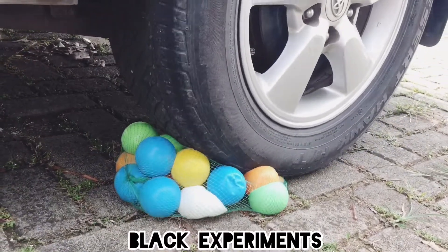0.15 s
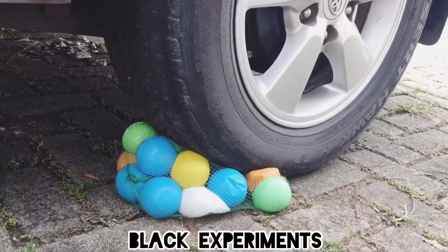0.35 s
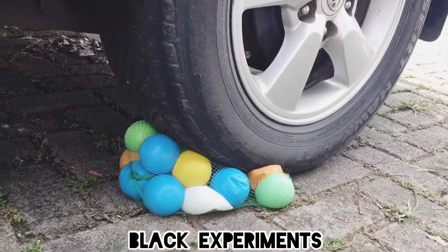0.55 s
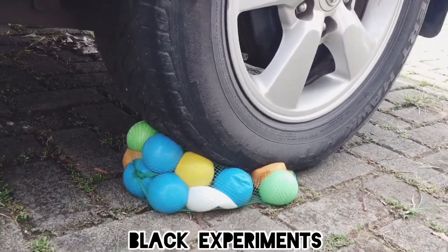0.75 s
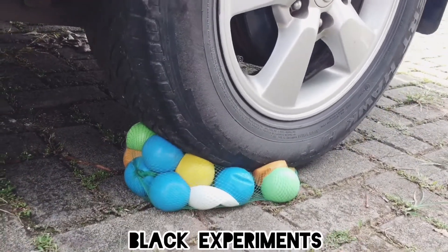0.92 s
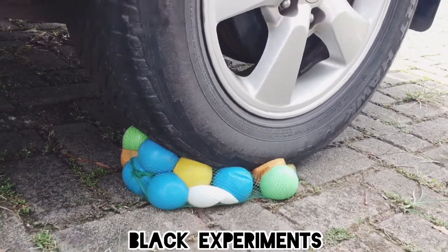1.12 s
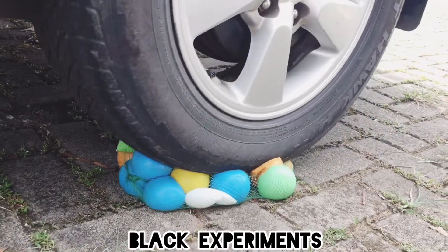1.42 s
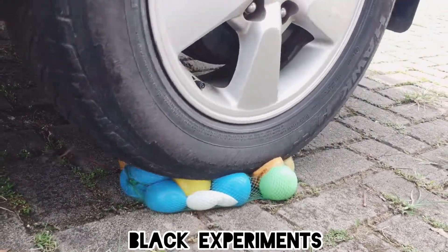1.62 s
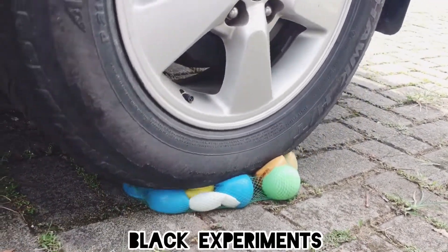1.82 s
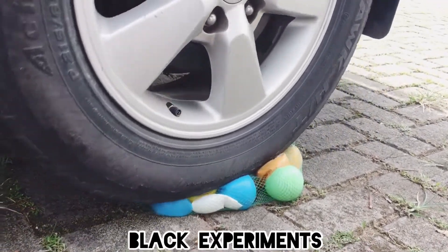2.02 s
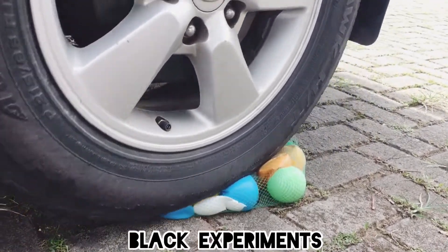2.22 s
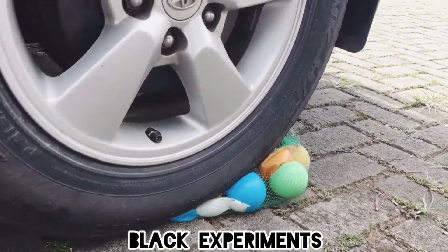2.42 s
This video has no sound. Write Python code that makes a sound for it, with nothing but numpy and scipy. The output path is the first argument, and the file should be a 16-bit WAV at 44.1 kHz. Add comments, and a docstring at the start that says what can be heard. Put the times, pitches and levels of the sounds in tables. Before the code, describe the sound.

Hollow plastic balls crack, crunch and pop under a slowly rolling car tyre, engine rumbling low

```python
"""Hollow plastic balls in a net on paving stones snap as a car creeps over them.
Each shell that buckles gives a crack of noise and a short ring; smaller buckles make a fine crinkle.
Two balls burst in blasts of noise, and air hisses and whistles out of the split ones.
The engine, just above idle, adds tones locked to its firing rate and a throbbing roar.
The wheel and underbody throw the ball sounds back; the loudest overload the close microphone."""
import sys
import numpy as np
from scipy import signal
from scipy.fft import rfft, irfft
from scipy.io import wavfile

SR = 44100
rng = np.random.default_rng(int(sys.argv[2]) if len(sys.argv) > 2 else 0)


def transcribe(signal):
    """Save signal, clipped to [-1, 1], as a 16-bit WAV file at the path in sys.argv[1]."""
    frames = np.atleast_2d(signal).T
    limited = np.clip(frames, -1, 1)
    pcm = np.round(limited * 32767).astype(np.int16)
    wavfile.write(sys.argv[1], SR, pcm)


N = 112454  # length of the scene in samples

# Colour of a cracking shell. Each row: frequency in Hz, relative level in dB per Hz.
CRACK_COLOUR = [(100, -16.5), (600, -10), (1000, 6.5), (2100, 3), (3700, 6.5), (4700, -4), (6300, 0),
                (9500, -8.5), (11000, -12), (16000, -14.5)]
# Colour of escaping air. Each row: frequency in Hz, relative level in dB per Hz.
AIR_COLOUR = [(100, -18), (1000, 11), (3400, 4), (5000, 3), (9000, 5), (10500, 0.5), (13000, 2),
              (16000, -7)]


def amp(db):
    """Turns decibels into a plain multiplier."""
    return 10 ** (np.asarray(db) / 20)


def unit(x):
    """Scales a sound to an rms (average strength) of 1."""
    return x / np.sqrt(np.mean(x ** 2) + 1e-20)


def curve(points):
    """Joins (seconds, value) points with straight lines over the whole scene."""
    seconds, values = np.transpose(points)
    return np.interp(np.arange(N) / SR, seconds, values)


def add(mix, start_s, sound):
    """Adds a sound into the mix at its start time, cut off at the end of the scene."""
    first = max(round(start_s * SR), 0)
    part = mix[first:][:len(sound)]
    part += sound[:len(part)]


def noise(colour, size, tilt_db=0):
    """Noise of rms 1 with a given colour, tilted by some dB per octave."""
    octave = np.log2(np.fft.rfftfreq(size, 1 / SR) + 1)
    hz, db = np.transpose(colour)
    gain = amp(np.interp(octave, np.log2(hz), db) + tilt_db * octave)
    random_phase = np.exp(2j * np.pi * rng.random(len(gain)))
    return unit(irfft(gain * random_phase, size))


def wander(rate_hz):
    """Random motion of rms 1 that fades out smoothly above the given rate."""
    hz = np.fft.rfftfreq(N, 1 / SR)
    spectrum = rfft(rng.standard_normal(N))
    return unit(irfft(spectrum * np.exp(-(hz / rate_hz) ** 2), N))


def band(hz, width_hz):
    """Narrow noise of rms 1 around a steady or moving centre."""
    turn = 2 * np.pi * np.cumsum(hz * np.ones(N)) / SR
    return unit(wander(width_hz) * np.cos(turn) + wander(width_hz) * np.sin(turn))


def car():
    """Firing tones, exhaust boom, a body hum and lumpy noise that throbs with each firing."""
    # Engine firing rate before its small random drift. Each row: time in seconds, rate in Hz.
    firing = [(0, 24.32), (1.7, 24.17), (2.15, 26.29), (2.55, 26.07)]
    # Engine tones. Each row: multiple of the firing rate, level in dB before wavering and level curve.
    orders = [(4, -34.5), (5, -41.5), (8, -39), (21, -42)]
    # Exhaust boom at twice the firing rate, swelling under load.
    # Each row: time in seconds, level in dB before wavering and level curve.
    boom_level = [(0, -38), (1.85, -38), (2.1, -29.5), (2.55, -36)]
    # Colour of engine and rolling noise. Each row: frequency in Hz, relative level in dB per Hz.
    roar_colour = [(20, -40), (45, -15), (150, -2.5), (200, 2), (290, 1.5), (450, -4.5), (800, -5),
                   (2000, -10), (3500, -15), (4600, -25), (8000, -30.5), (16000, -44)]
    # Level curve: the car is heard to dip after the first burst and come back.
    # Each row: time in seconds, level in dB.
    level_curve = [(0, 0), (.14, -4), (.2, 0), (.55, 2), (.95, 1.5), (1.02, -8), (1.14, -21), (1.185, -6.5),
                   (1.33, -7.5), (1.58, -2.5), (1.72, -0.5), (2.2, -2.5), (2.55, 0.5)]
    waver_db, waver_hz = 2.6, 18
    lump_db, lump_hz = 1.4, 30
    roar_db, throb_depth = -27, 0.28
    hum_hz, hum_db, hum_width_hz = 264.7, -33.5, 12.3
    tone_follow = 1.34  # the tones follow the level curve more strongly than the noise

    rate = curve(firing) * (1 + 0.00555 * wander(5.44))
    angle = 2 * np.pi * np.cumsum(rate) / SR
    tones = np.zeros(N)
    for multiple, db in orders:
        tone = unit(np.cos(multiple * angle + 2 * np.pi * rng.random()))
        tones += amp(db + waver_db * wander(waver_hz)) * tone
    boom = amp(curve(boom_level) + waver_db * wander(waver_hz)) * unit(np.cos(2 * angle))

    throb = 1 + throb_depth * np.cos(angle)
    lumps = amp(lump_db * wander(lump_hz))
    roar = amp(roar_db) * noise(roar_colour, N) * throb * lumps
    hum = amp(hum_db) * band(hum_hz, hum_width_hz)
    level_db = curve(level_curve)
    return (tones + boom) * amp(tone_follow * level_db) + (roar + hum) * amp(level_db)


def ring(hz, t):
    """Two close shell modes that start sharp, sag as the wall gives way and are choked by the tyre."""
    stiffness, relax_s = 0.35, 0.0006  # the pitch starts 35 % above hz and soon settles there
    rise_s, decay_s, damping_power = 0.0004, 0.0018, 2.2
    partner_ratio, partner_db = 1.243, -17.5  # the second mode, before the slope is taken

    turn = 2 * np.pi * hz * (t + stiffness * relax_s * (1 - np.exp(-t / relax_s)))
    envelope = (1 - np.exp(-t / rise_s)) * np.exp(-(t / decay_s) ** damping_power)
    motion = envelope * (np.sin(turn) + amp(partner_db) * np.sin(partner_ratio * turn))
    return np.gradient(motion, turn)  # the slope of the motion is what sounds


def crinkle():
    """Tiny random buckles of crushed plastic ring shells of many sizes."""
    # Level of the fine crinkling. Each row: time in seconds, level in dB.
    crinkle_level = [(0, -35.5), (.25, -28), (.4, -39), (.95, -43), (1.12, -53), (1.19, -35.5), (1.45, -44),
                     (1.62, -34), (1.82, -27), (1.95, -36.5), (2.16, -28.5), (2.28, -33.5), (2.5, -35.5)]
    clicks_per_s, spread_db = 180, 5.3  # the rate is the average over all sizes together
    sizes = 14
    crack_db, crack_decay_s = -4, 0.0024

    out, t = np.zeros(N), np.arange(512) / SR
    for hz in np.geomspace(750, 2400, sizes):
        strength = amp(spread_db * np.minimum(rng.exponential(1, N), 3))
        clicks = strength * (rng.random(N) < clicks_per_s / sizes / SR)
        crack = noise(CRACK_COLOUR, len(t)) * np.exp(-t / crack_decay_s)
        grain = ring(hz, t) + amp(crack_db) * crack
        out += signal.oaconvolve(clicks, grain)[:N]
    return unit(out) * amp(curve(crinkle_level))


def snaps():
    """Each buckle is a sharp crack and a few cycles of the shell's ring."""
    # Buckling shells. Each row: start in seconds, settled ring pitch in Hz, ring level in dB,
    # crack level in dB before its decay, crack tilt in dB per octave.
    buckles = [(0.0793, 740, -12, -12.5, -3), (0.0879, 676, -13.5, -12.5, 0.5),
               (0.1762, 1184, -21, -11.5, -1.5), (.2106, 1030, -5, -6, -5), (0.265, 1190, -11, -9, 7.5),
               (.282, 1190, -24, -6.5, -4), (.302, 1090, -11, -29, -9), (0.328, 1780, 1, 5.5, -2),
               (0.352, 990, -7, 3.5, -1), (.471, 1110, -17, -37, 0), (0.4846, 1480, -17, -2.5, 2),
               (0.5084, 1110, -4, -7.5, 1), (0.7595, 1110, -21, 0, 5.5), (0.8366, 1200, -5, -5, 9),
               (0.837, 2000, 4, 7, -1.5), (0.8564, 700, -24, -11.5, 0), (0.8804, 1020, -1, -9, 0),
               (0.9192, 1100, -12, -22.5, 6), (.931, 940, -8, -34, 2), (1.0798, 1300, -28, -25, 1),
               (1.0941, 1320, -27, -24.5, -0.5), (1.2674, 1030, -11, -12, -2),
               (1.275, 1020, -11, -9.5, -0.5), (1.296, 1280, -17, -8.5, -2.5), (1.391, 750, -10, -5.5, 6),
               (1.4101, 1870, 1, -0.5, -3.5), (1.422, 1160, -11, -15.5, -3), (1.4895, 1640, 3.5, 4, -0.5),
               (1.5288, 1480, -7, -8, 1), (1.5475, 834, -11, -14, 0), (1.566, 830, -3.5, -11, 17),
               (1.6205, 1070, -2.5, -12.5, 4.5), (1.6397, 1160, -1, -13, -1), (1.645, 1110, -6, -16.5, 7),
               (1.691, 1090, -12.5, -13.5, -5), (1.7099, 2020, -6.5, -7, 0.5),
               (1.7487, 1980, -8.5, -23, -1), (1.7591, 1020, -3.5, -9, 4.5), (1.8004, 1115, 4, 2, -3),
               (1.8067, 1060, -7, -5.5, -4.5), (1.8203, 1120, -1.5, -4.5, -3), (1.864, 1350, -9, -7.5, -1),
               (1.9300, 1090, -4.5, -0.5, 5), (1.957, 1320, -8.5, -10.5, -1), (2.006, 3330, -29, -7, 3.5),
               (2.051, 1420, -5.5, -12, 6), (2.118, 2430, -9, -12.5, -5.5), (2.152, 1320, -6, -10, -9),
               (2.1585, 3200, -17, -15, 0), (2.1929, 1350, 10, -7, -5), (2.5085, 1690, -11, -14.5, -3.5)]
    crack_decay_s = 0.0013

    out, t = np.zeros(N), np.arange(1024) / SR
    for start_s, hz, ring_db, crack_db, tilt_db in buckles:
        crack = noise(CRACK_COLOUR, len(t), tilt_db) * np.exp(-t / crack_decay_s)
        add(out, start_s, amp(ring_db) * ring(hz, t) + amp(crack_db) * crack)
    return out


def leaks():
    """Smooth jets of air from the split balls, and slits that whistle as they narrow and widen."""
    # Air escaping from split shells. Each row: time in seconds, level in dB before the flutter.
    leak_level = [(.248, -49), (.26, -20.5), (.285, -24.5), (.32, -32), (.39, -40), (.6, -50), (1.15, -67),
                  (1.22, -42.5), (1.32, -64), (1.51, -40.5), (1.53, -27.5), (1.67, -40), (1.86, -27),
                  (2.01, -42), (2.04, -30.5), (2.11, -30), (2.16, -25), (2.25, -28), (2.29, -33),
                  (2.365, -32), (2.47, -51)]
    # Two narrow slits that whistle under the full weight, one list for each.
    # Each row: time in seconds, level in dB before the flutter, centre in Hz.
    slits = [
        [(2.02, -43, 13300), (2.21, -33, 14500), (2.33, -48, 14500)],
        [(2.08, -52, 10470), (2.17, -37, 8480), (2.225, -20.5, 5990), (2.28, -29.5, 5930), (2.35, -30.5, 6340),
         (2.47, -52, 6070)],
    ]
    slit_width_hz = 1600
    flutter_db, flutter_hz = 1.2, 260

    t = np.arange(N) / SR
    air = noise(AIR_COLOUR, N) * amp(curve(leak_level))
    for slit in slits:
        s, db, hz = np.transpose(slit)
        whistle = band(np.interp(t, s, hz), slit_width_hz) * amp(np.interp(t, s, db))
        air += whistle * (t > s[0]) * (t < s[-1])
    return air * amp(flutter_db * wander(flutter_hz))


def bursts():
    """A blast of air and a bright rip of plastic; the first also groans, rings and thumps."""
    # Bursting balls. Each row: start in seconds, blast level in dB before its decay,
    # blast decay in seconds, rip level in dB before its decay, rip decay in seconds.
    burst_list = [(0.9528, 5, 0.0081, -4, 0.0045), (1.831, -0.5, 0.0061, -6.5, 0.011)]
    # Colour of a blast. Each row: frequency in Hz, relative level in dB per Hz.
    blast_colour = [(30, -23), (130, 3), (420, 1), (1100, 1.5), (1900, 0.5), (3200, -13), (16000, -89)]
    # The first ball's shell rings on after it splits. Each row: pitch in Hz, level in dB before decay.
    shell_modes = [(695, -4.5), (985, -3.5), (1650, -9.5), (2150, -18)]
    # The first ball groans as it splits, then the tyre drops. Each row: peak time in seconds,
    # pitch at the peak in Hz, peak level in dB, rise in seconds, decay in seconds,
    # pitch fall per second (as an exponential rate), roughness in radians.
    swells = [(.952, 921, -3.5, 0.0072, 0.0041, 4.6, 1), (0.9684, 63, -4, 0.0062, 0.0105, 22, 0.029)]
    shell_decay_s, rough_hz = 0.010, 443

    out, t = np.zeros(N), np.arange(8192) / SR
    shell = sum(amp(db) * np.sin(2 * np.pi * hz * t) for hz, db in shell_modes)
    add(out, burst_list[0][0], shell * np.exp(-t / shell_decay_s))
    for start_s, blast_db, blast_decay_s, rip_db, rip_decay_s in burst_list:
        blast = amp(blast_db) * noise(blast_colour, len(t)) * np.exp(-t / blast_decay_s)
        rip = amp(rip_db) * noise(AIR_COLOUR, len(t)) * np.exp(-t / rip_decay_s)
        add(out, start_s, blast + rip)

    from_peak = t - t.mean()  # seconds before (negative) or after the peak
    for peak_s, hz, db, rise_s, decay_s, fall, rough in swells:
        turn = 2 * np.pi * hz * (1 - np.exp(-fall * from_peak)) / fall
        turn += rough * wander(rough_hz)[:len(t)]
        envelope = np.exp(np.minimum(from_peak / rise_s, -from_peak / decay_s))
        add(out, peak_s + from_peak[0], -amp(db) * envelope * np.cos(turn))
    return out


def reflections(x):
    """Quick, duller echoes off the tyre and paving, and a faint tail from under the car."""
    echo_db, echo_decay_s, echo_corner_hz = -10.5, 0.0055, 4560
    tail_db, tail_decay_s = -16.5, 0.019
    gap_s = 0.0016  # silence before the first echo, then an equally long fade-in

    t = np.arange(8192) / SR
    out = x.copy()
    b, a = signal.butter(1, echo_corner_hz, fs=SR)
    dull = signal.lfilter(b, a, x)
    for source, db, decay_s in (dull, echo_db, echo_decay_s), (x, tail_db, tail_decay_s):
        fade_in = np.clip(t / gap_s - 1, 0, 1)
        taps = rng.standard_normal(len(t)) * np.exp(-t / decay_s) * fade_in
        out += amp(db) * signal.oaconvolve(source, taps / np.linalg.norm(taps))[:N]
    return out


def scene():
    """Only the ball impacts get echoes; the air and the car are added as they are."""
    impacts = crinkle() + snaps() + bursts()
    return (reflections(impacts) + leaks() + car())[None]


def record(dry):
    """The overloaded microphone flattens the peaks; then a filter removes the highest treble."""
    clip_level, edge_hz = 1.0, 16000
    clipped = np.clip(dry, -clip_level, clip_level)
    low_pass = signal.firwin(255, edge_hz, window=("kaiser", 8), fs=SR)
    return signal.oaconvolve(clipped, low_pass[None], "same")


dry = scene()
out = record(dry)
transcribe(out)
```